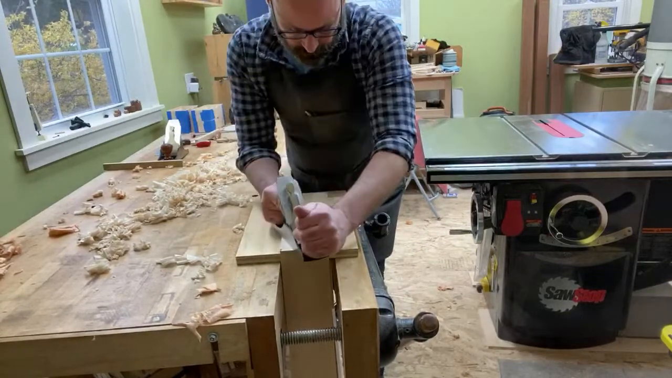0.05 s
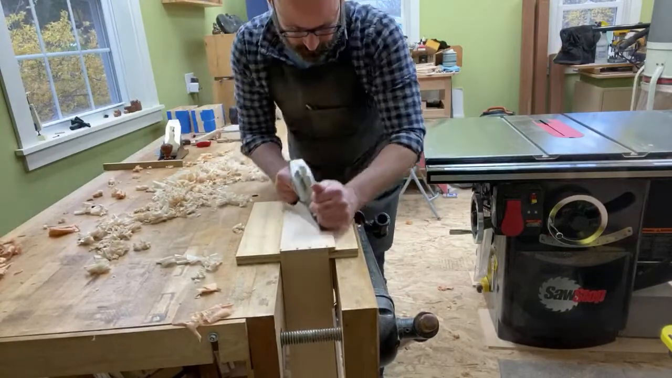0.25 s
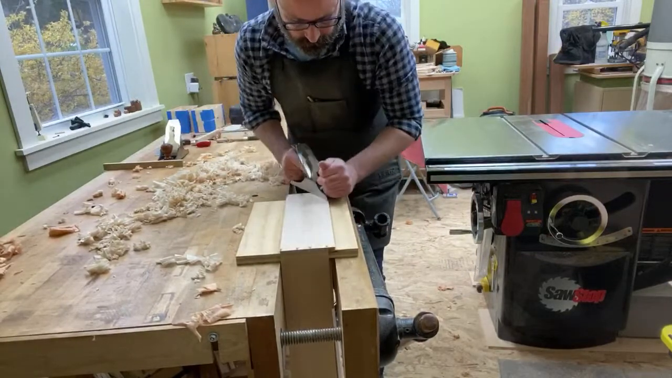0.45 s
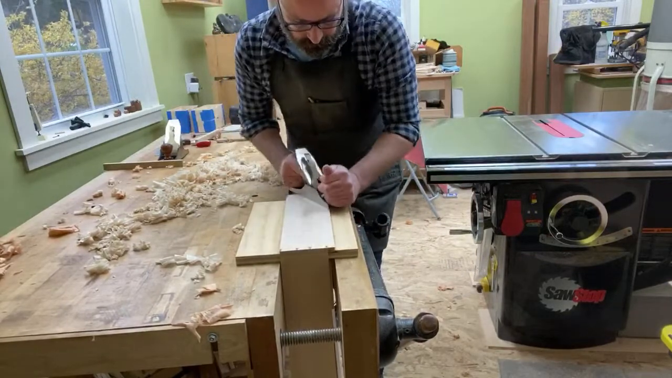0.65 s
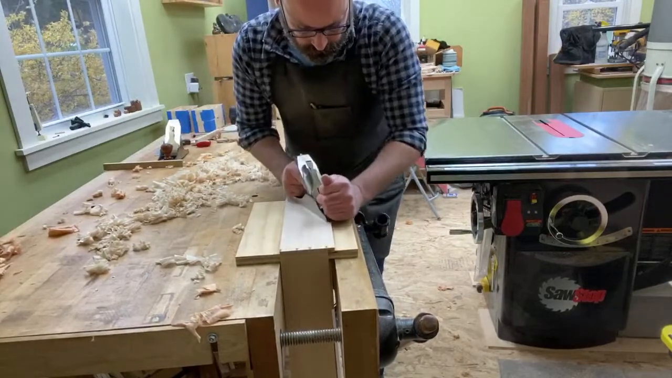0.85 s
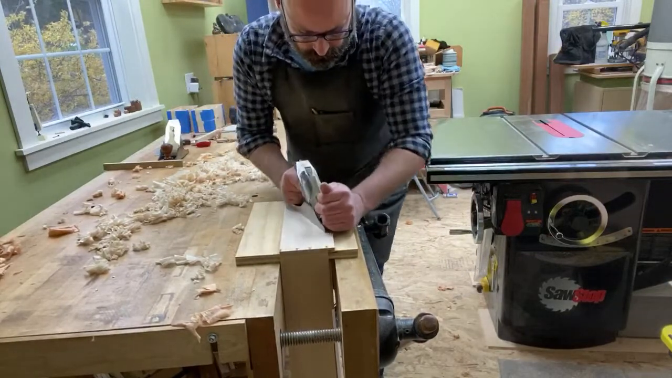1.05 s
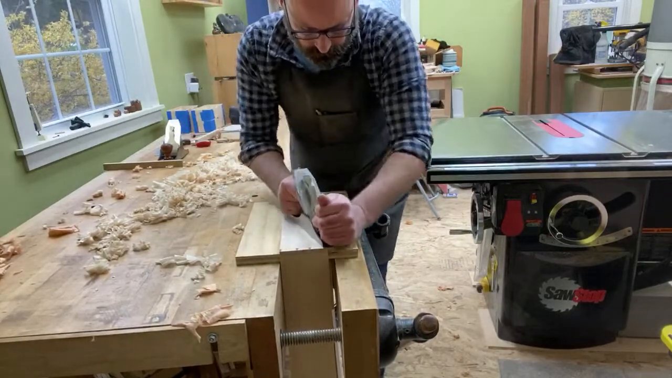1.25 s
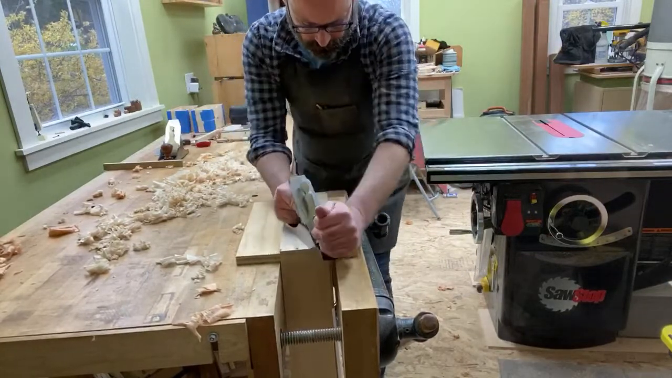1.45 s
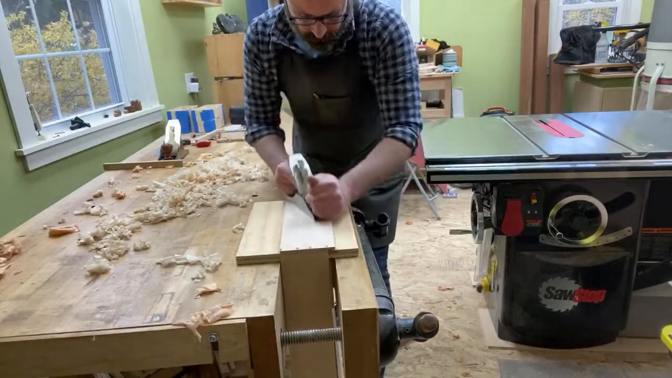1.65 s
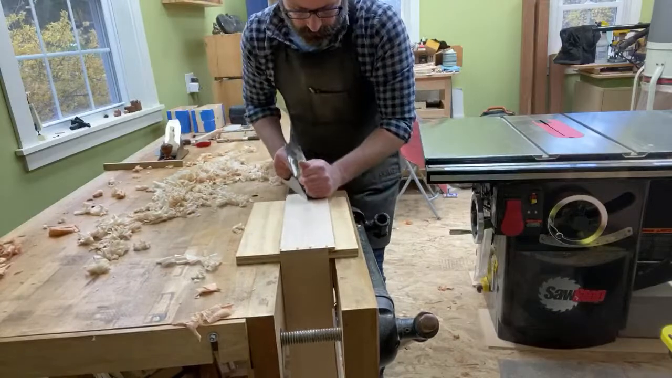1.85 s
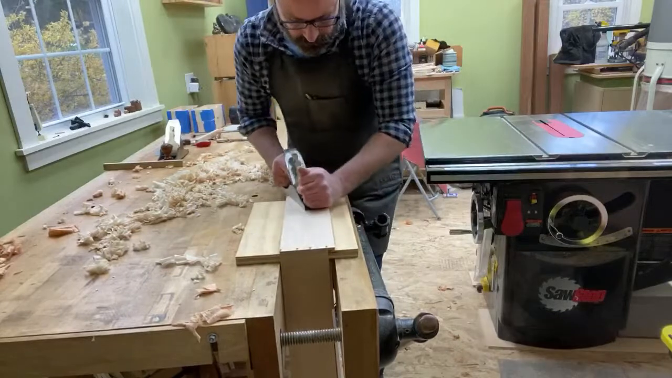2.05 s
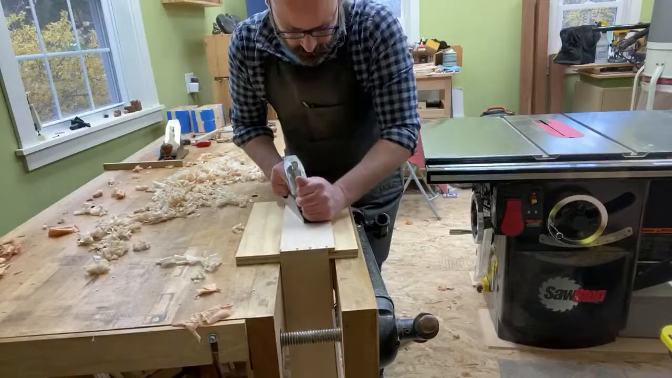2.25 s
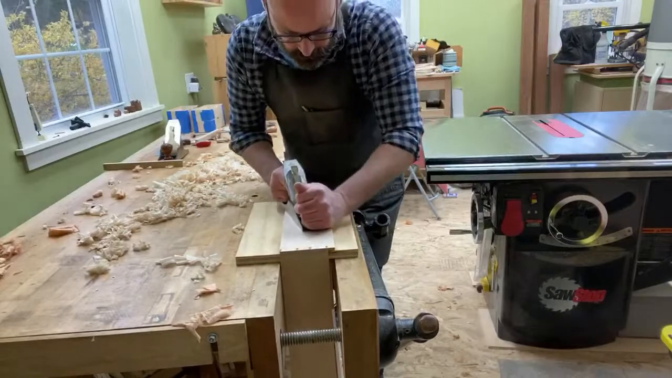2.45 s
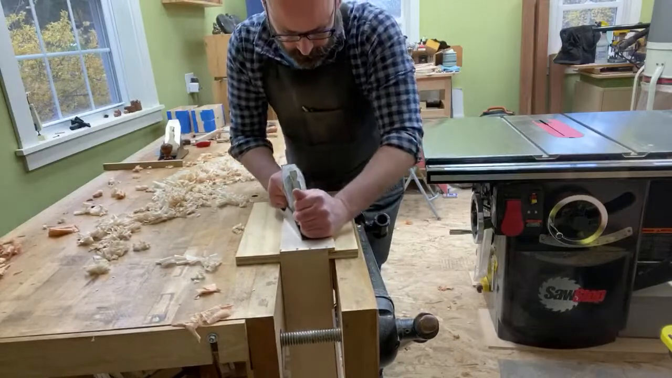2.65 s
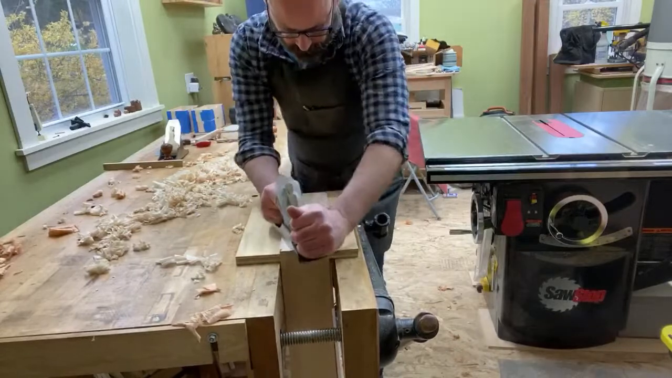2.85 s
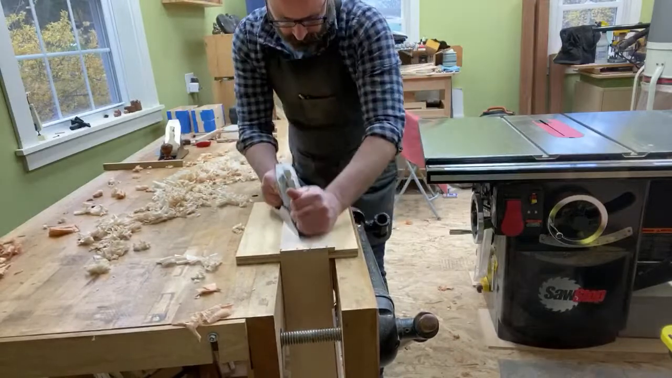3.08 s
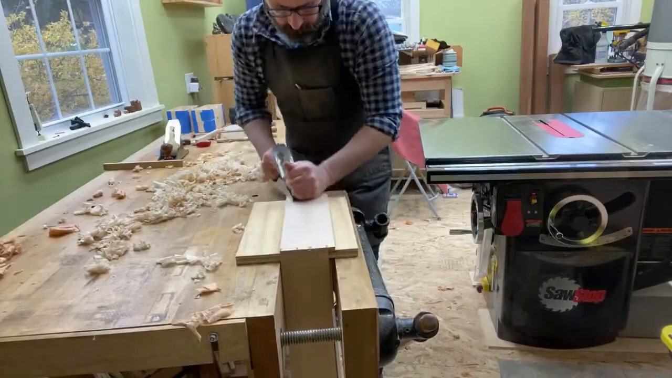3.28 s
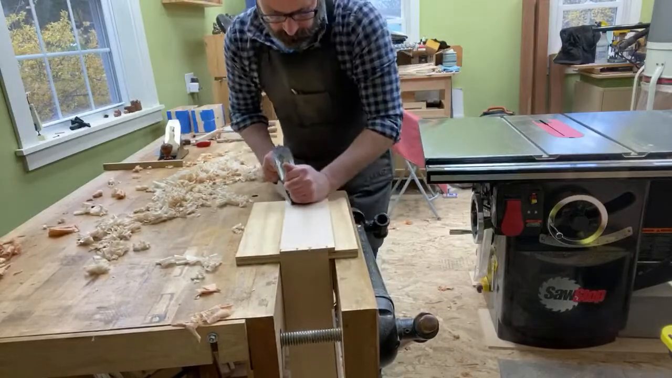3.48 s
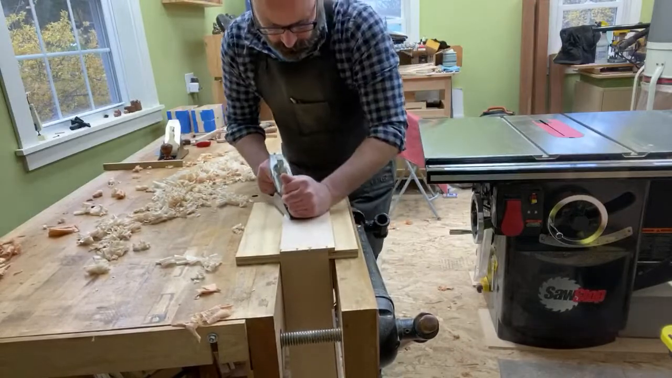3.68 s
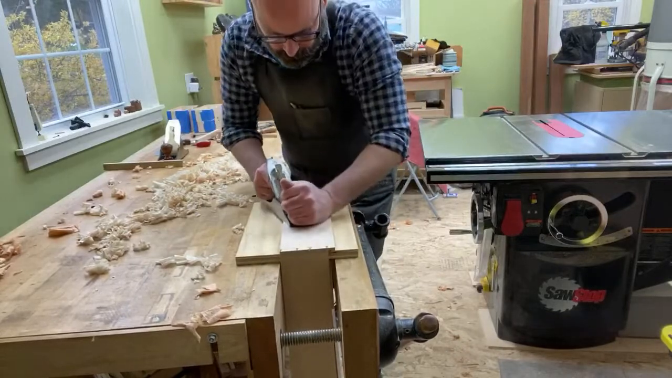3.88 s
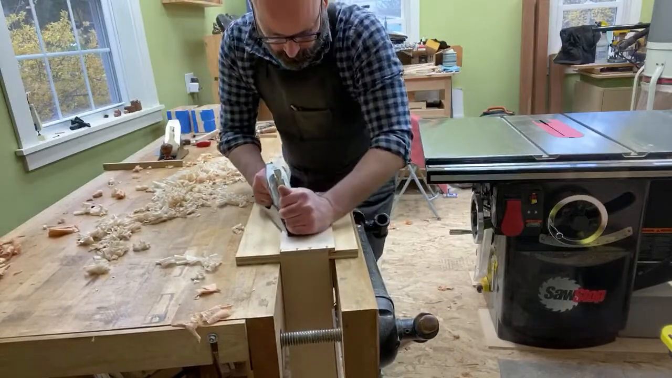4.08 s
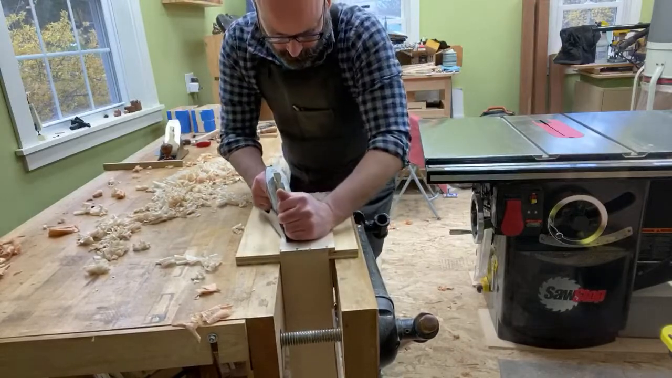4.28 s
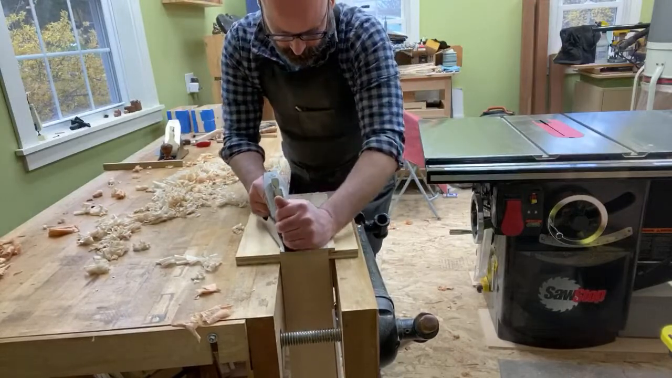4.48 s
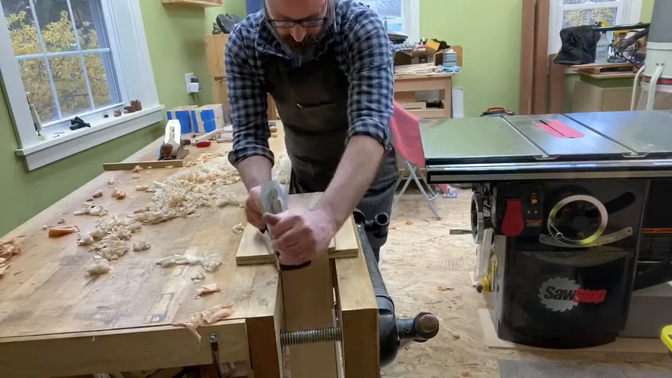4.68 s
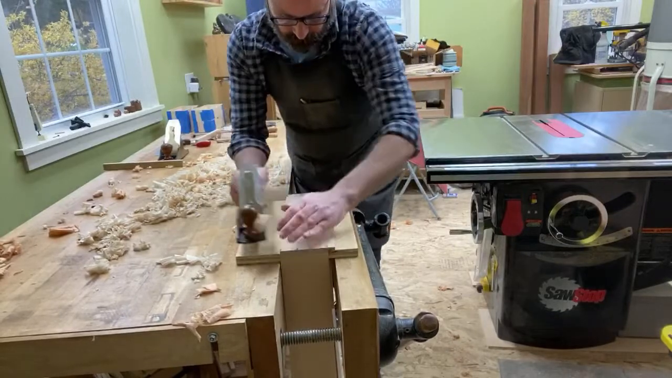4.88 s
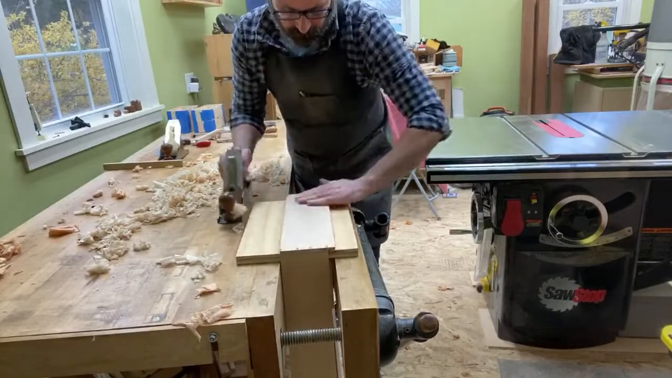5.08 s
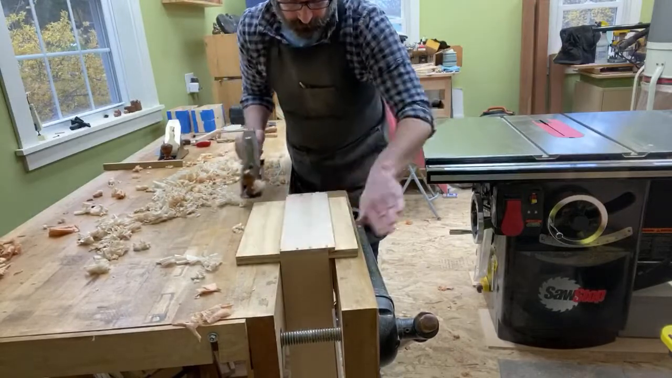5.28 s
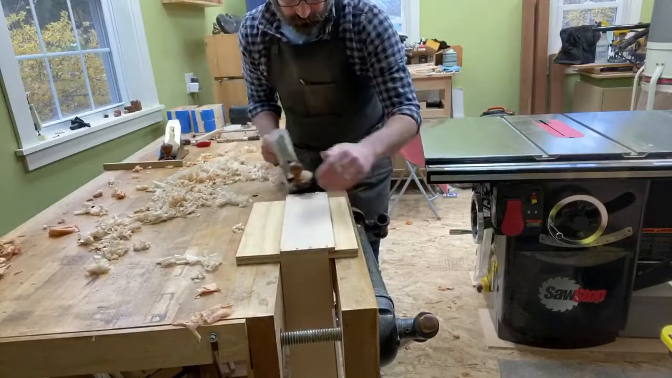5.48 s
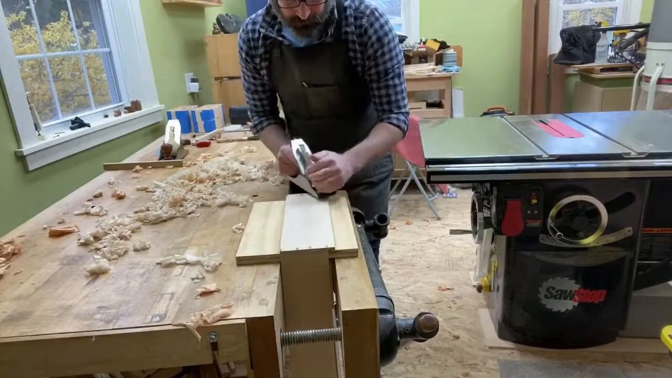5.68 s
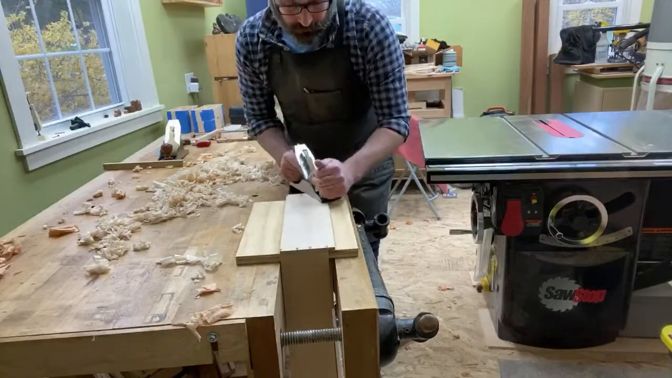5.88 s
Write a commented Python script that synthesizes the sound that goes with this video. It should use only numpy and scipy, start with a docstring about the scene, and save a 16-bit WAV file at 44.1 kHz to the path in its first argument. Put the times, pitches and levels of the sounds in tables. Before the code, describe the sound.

A hand plane works a board clamped to a wooden bench in a small, quiet shop, heard from nearby with a short, light room echo and a very faint low hush. From 0 to about 4.6 s come seven uneven passes of dry, gritty rasping: bright metallic scrape and airy hiss over a hollow wooden hum, with short stuttering shudders. A first pass ends near 0.5 s; a loud, sharp wooden clack hits at 0.6 s. Longer, fluctuating rubbing follows until 1.4 s, then a strong rasp around 1.6 s, small bumps at 1.9 s, and a long shuddering stroke to 2.9 s. Quicker scrapes follow from 3 s, with a dull thump at 3.36 s and scuffs near 3.7 s. The last pass fades by 4.6 s. A palm softly rustles chips away around 5.1 to 5.3 s with faint taps, then two firm knocks with slight metal rattle land at 5.7 and 5.8 s.

```python
"""A hand plane is pushed and drawn back over a board clamped in a bench vise, in a small quiet shop.
Rubbing and cutting are friction noises that drive the resonances of bench, board and iron plane.
The sole sticks and slips in short shudders; knocks are brief contact forces, scuffs decaying noise bursts.
A hand sweeps chips off the board as coloured friction noise; the shop adds its decaying answer and a steady hush."""
import sys
import numpy as np
from scipy import signal
from scipy.fft import rfft, irfft, next_fast_len
from scipy.io import wavfile
from scipy.ndimage import uniform_filter1d, map_coordinates

SR = 44100
rng = np.random.default_rng(int(sys.argv[2]) if len(sys.argv) > 2 else 0)


def bounce(signal):
    """Save signal as a 16-bit WAV file at the path given by the first command-line argument."""
    frames = np.transpose(np.atleast_2d(signal))
    limited = np.clip(frames, -1, 1)
    pcm = np.round(limited * 32767).astype(np.int16)
    wavfile.write(sys.argv[1], SR, pcm)


N = 261513

# Spectrum of the quiet shop's hush. Each row: frequency in Hz, relative level in dB.
HUSH = [(18, -76.5), (30, -35), (90, -7.5), (108, -8), (126, -4), (152, -11), (323, -14), (359, -8.5),
        (518, -16), (672, -17), (1020, -19.5), (1960, -24.5), (3060, -25.5), (8710, -35), (15500, -44.5)]
HUSH_DB = -64.5  # rms level of the hush
# Decay of the shop's answer. Each row: frequency in Hz, time to fall 60 dB in s.
SHOP = [(100, 0.97), (300, 0.34), (1000, 0.5), (3000, .4), (10000, 0.16)]
SHOP_BASS_HZ = 450  # the shop answers weakly below this
TOP_HZ = 15700  # upper band limit of the input

# A hand sweeping chips off the board. Each row: time in s, level in dB.
SWEEP = [(4.97, -85.5), (5.05, -65.5), (5.1, -60.5), (5.16, -58.5), (5.2, -59), (5.24, -58.5), (5.32, -76),
         (5.45, -89)]
# Spectral weighting of the rustling chips. Each row: frequency in Hz, gain in dB.
CHIPS = [(300, -40), (900, -10), (2000, -7.5), (3300, -2), (4200, -3), (6000, -9), (10000, -18.5),
         (15500, -27.5)]

# Resonances of bench top, bench legs, board, plane body, cap, iron and board edge.
# Each row: frequency in Hz, width in Hz, relative level in dB.
BENCH = [(223, 12, -18.5), (312.5, 20, 6.5), (372.6, 14, -18), (379, 110, -12)]
LEGS = [(74.6, 13, -3.5), (139.7, 7.9, -4), (179.3, 15, -3)]
BOARD = [(483, 130, -12.5), (563.2, 12, -3.5), (675, 24, -9), (701.4, 17, -10.5), (753, 23, -2.5),
         (817.5, 40, -6.5), (930, 90, -18), (989, 19, -12), (1065, 120, -23), (1265, 69, -20.5),
         (1262, 56, -17), (1444, 54, -24.5), (1453, 43, -20.5), (1746, 53, -8.5), (1000, 1200, -12.5)]
PLANE = [(2460, 200, -14.5), (2623, 180, 11), (3180, 240, -2), (3510, 39, -0.5), (2900, 1800, 6)]
CAP = [(4110, 170, 4.5), (5445, 130, 3.5), (5800, 110, -6), (6366, 160, -2.5), (5280, 2200, -9)]
IRON = [(6420, 900, 0), (8180, 50, -7.5), (9500, 93, 6), (9500, 120, -4.5), (10000, 100, -5),
        (10960, 110, -3.5), (12200, 120, -2.5), (12830, 300, -10), (13970, 250, -10), (9190, 3800, -4)]
EDGE = [(670, 360, 0.85), (1210, 760, -0.79), (2450, 1500, -2.3)]
# Resonances of the vise that carries blows into the bench. Each row: frequency in Hz, width in Hz, level in dB.
VISE = [(330, 61, -2.5), (324, 380, -8)]
# Radiation of each body. Each row: its resonances, weak below in Hz, weak above in Hz.
BODIES = [(BENCH, 310, 450), (LEGS, 55, 1100), (BOARD, 423, 2080), (PLANE, 1600, 4800), (CAP, 5030, 7800),
          (IRON, 2400, 10000), (EDGE, 92, 3750)]

# Short scrapes over an edge. Each row: start in s, edge level in dB, plane body level in dB, iron level in dB,
# rise time constant in ms, time to fall 60 dB in ms.
SCUFFS = [(.036, -31.5, -39.5, -51.5, 2.6, 193), (.054, -27, -40, -51, 1.6, 78),
          (1.403, -30.5, -41, -56, 4.4, 97), (1.545, -38, -59, -75, 5.1, 63),
          (2.031, -31.5, -37, -62, 4, 128), (2.889, -33.5, -50, -62, 3.4, 128),
          (2.934, -33, -55, -68, 5.2, 135), (3.056, -35.5, -50, -66, 5, 79),
          (3.242, -30, -39.5, -57, 1.9, 86), (3.66, -34.5, -44, -60, 8, 110),
          (3.678, -28, -45, -62, 5.2, 105), (3.706, -25, -35, -52, 5.3, 91), (4.56, -44, -45, -48, 4.2, 79),
          (5.206, -42, -43, -54, 2, 37)]
# Scuff force on bench, legs and board, in dB relative to the edge.
SCUFF_WOOD_DB = [-21.5, -23.5, -4.5]
SCUFF_CAP_DB = -10.5  # relative to the plane body

# Blows on the wood. Each row: start in s; force in dB on board, bench (before the vise), legs, plane body and cap;
# clatter in dB; contact spring frequency in Hz; time to the peak of the contact push in ms.
KNOCKS = [(.395, -42.5, -40.5, -58, -55.5, -45, -53.5, 625, 1.43),
          (.545, -57.5, -45, -52, -59, -55.5, -61, 750, 5.5),
          (.593, -12.5, -9, -31.5, -47, -21, -30, 703, 1.9),
          (1.872, -38, -28.5, -41, -61, -54.5, -48, 655, 1.8),
          (1.914, -42, -53, -44, -50.5, -39, -51, 674, 1.55),
          (3.358, -36, -15.5, -31, -59, -41, -35.5, 757, 1.67),
          (3.444, -48.5, -28.5, -41, -60, -54, -40, 684, 2.7),
          (4.559, -45, -33, -48.5, -55, -39, -50.5, 747, 2.83),
          (4.914, -71, -52, -74.5, -69.5, -66.5, -67, 690, 1.3),
          (5.154, -73.5, -54, -61.5, -72, -43, -70.5, 668, 1.6),
          (5.212, -49.5, -25, -43, -59, -33.5, -59, 625, 2.9),
          (5.242, -59, -27, -45.5, -72, -64.5, -64.5, 626, 1.9),
          (5.323, -78, -51, -53.5, -78.5, -62.5, -76, 610, 1.9),
          (5.708, -29.5, -14.5, -44.5, -29.5, -40.5, -26.5, 1430, 1.2),
          (5.798, -24.5, -12, -43, -35.5, -43, -36, 690, 1.73)]

# Stick-slip of the sole with the bench top. Each row: middle in s, peak force in dB, width between 1/e points in ms.
SHUDDERS = [(.155, -78, 60), (.435, -76, 34), (.498, -71, 24), (.976, -72, 43), (1.084, -71, 50),
            (1.2, -63.5, 32), (1.41, -71, 27), (1.55, -68, 29), (1.72, -75.5, 34), (1.85, -68, 38),
            (2.075, -63, 37), (2.195, -75, 32), (2.34, -70.5, 70), (2.59, -60.5, 87), (2.689, -60, 56),
            (2.79, -63.5, 62), (2.9, -71, 89), (3.18, -72, 70), (3.9, -71.5, 73), (4.0, -66, 37),
            (4.055, -64.5, 41), (4.214, -62, 60), (4.32, -68, 65), (4.464, -61.5, 110)]
SHUDDER_HZ, SHUDDER_SPREAD_HZ = 316.6, 4  # near the bench top's main mode; standard deviation of the pitch
SHUDDER_BOARD_DB = 4.5  # friction it shakes into the board, relative to the peak of its slips

# The plane on the move, one table a pass.
# Each row: time in s, rasp level in dB, treble in dB over the rasp, hum of the bench top in dB.
PASSES = [
    [(0.0, -67, -10, -49), (.035, -69, -16, -61), (.11, -49.5, -16, -56.5), (.2, -52, -17, -58),
     (.25, -50.5, -11, -65), (.3, -50, -17, -77), (.4, -55, -12, -55), (.52, -73, -12.5, -56.5)],
    [(.57, -57, -13, -46), (.64, -50.5, -11, -45.5), (.8, -53, -17, -49.5), (1.0, -57.5, -8, -52.5),
     (1.2, -54.5, -14, -51.5), (1.28, -52, -14, -57), (1.39, -63, -12, -50)],
    [(1.42, -53.5, -24, -54), (1.53, -56.5, -22, -54.5), (1.61, -42.5, -14.5, -56), (1.67, -46.5, -10, -68),
     (1.77, -47.5, -16, -61), (1.85, -66, -18, -47.5)],
    [(1.9, -57, -8, -51), (2.0, -52, -11.5, -55), (2.15, -48.5, -19, -47.5), (2.25, -51, -13, -66),
     (2.49, -53, -17, -51), (2.58, -51, -15, -52), (2.7, -48, -11.5, -49), (2.8, -48, -12, -58),
     (2.87, -69, -28, -49.5)],
    [(2.99, -53, -14, -71), (3.05, -44.5, -13, -60), (3.15, -46.5, -10, -49.5), (3.19, -52.5, -12, -57),
     (3.23, -51.5, -7, -49), (3.34, -68.5, -14.5, -48.5)],
    [(3.37, -53, -12, -37), (3.47, -57, -11, -48), (3.54, -49, -12, -61), (3.62, -56, -8, -72),
     (3.7, -47, -12, -48), (3.78, -53, -20, -47)],
    [(3.84, -42.5, -16, -68), (3.92, -49.5, -14, -51.5), (4.08, -55.5, -13, -52.5), (4.26, -56, -16.5, -47),
     (4.43, -50.5, -14.5, -49.5), (4.56, -58, -8.5, -51.5), (4.75, -89, -5, -77), (4.85, -96.5, -8, -82.5)],
]
# How hard the cap rings along. Each row: time in s, level in dB over the rasp.
CAP_RING = [(0, -12), (.4, -5), (.64, -5.5), (1.0, -6.5), (1.29, 0), (1.6, -10.5), (1.85, -7.5), (2.0, 5),
            (2.2, -6.5), (2.5, -11.5), (2.8, -0.5), (3.1, -11.5), (3.38, -2.5), (3.54, 7.5), (3.66, -1),
            (3.9, -12.5), (4.28, -5), (4.42, -4.5), (4.85, 2)]
USUAL_RASP_DB = -52  # a middling pass
RUB_DB, RUB_FOLLOWS = -50.5, 0.55  # the sole's rub in a middling pass; its swing for each dB of rasp
HUM_PULSE_DB, HUM_PULSES_PER_S = 4, 11  # swing of the uneven hum; random knots a second


def amp(db):
    """Level law: gain of a level in dB."""
    return 10 ** (np.asarray(db) / 20)


def unit(x):
    """Power normalisation: x at rms 1."""
    return x / np.sqrt(np.mean(x ** 2) + 1e-20)


def along(points, hz):
    """Logarithmic frequency scale: (Hz, value) points are joined by straight lines."""
    point_hz, values = np.transpose(points)
    return np.interp(np.log(hz + 1), np.log(point_hz + 1), values)


def curves(rows):
    """Linear interpolation in time: one curve a column after the time, -120 dB outside the table."""
    s, *columns = np.transpose(rows)
    t = np.arange(N) / SR
    return [np.interp(t, s, column, left=-120, right=-120) for column in columns]


def wobble(rate):
    """Band-limited fluctuation: a smooth random curve, rate knots a second."""
    knots = rng.standard_normal(int(N * rate / SR) + 4)
    return map_coordinates(knots, [np.arange(N) * rate / SR])


def filtered(x, response):
    """Linear filtering: the spectrum of x times a complex response of frequency."""
    size = next_fast_len(N + SR // 2)  # the spare half second holds the tails
    hz = np.fft.rfftfreq(size, 1 / SR)
    return irfft(rfft(x, size) * response(hz), size)[..., :N]


def modes_of(modes, f):
    """Modal superposition: damped resonances of alternating sign are summed."""
    return sum((-1) ** k * amp(db) * 1j * f * width / (centre ** 2 - f ** 2 + 1j * f * width)
               for k, (centre, width, db) in enumerate(modes))


def rung(force, modes, low_hz, high_hz):
    """Forced vibration: a body's modes filter the force; white noise of rms 1 gives about rms 1."""
    def body(f):
        low_skirt = (1j * f / low_hz / (1 + 1j * f / low_hz)) ** 3
        high_skirt = 1 / (1 + 1j * f / high_hz) ** 4
        response = modes_of(modes, f) * low_skirt * high_skirt
        return response / np.sqrt(np.mean(abs(response) ** 2))
    return filtered(force, body)


def patchy(x, patch_db):
    """Time-frequency modulation: random gain in patches shifts the colour as the grain changes."""
    z = signal.stft(x, nperseg=256)[2]
    field = uniform_filter1d(rng.standard_normal(z.shape), size=4, axis=0)  # smooth over frequency
    field = uniform_filter1d(field, size=14, axis=1)  # smooth over time
    return unit(signal.istft(z * amp(patch_db * unit(field)), nperseg=256)[1][:N])


def friction(grit_db, slip_db):
    """Dry friction: noise of rms 1 that catches on single fibres and swells with slower slips."""
    swing_db = grit_db * wobble(700) + slip_db * wobble(35)
    return patchy(amp(swing_db) * rng.standard_normal(N), patch_db=3.0)


def hiss(spectrum):
    """Stationary random sound: smooth coloured noise of rms 1."""
    return unit(filtered(rng.standard_normal(N), lambda hz: amp(along(spectrum, hz))))


def shop(x):
    """Reverberation: each frequency of the room's noise-like answer decays at its own speed."""
    hz, t, z = signal.stft(rng.standard_normal(SR // 2), SR, nperseg=256)
    decay = amp(-60 * t / along(SHOP, hz)[:, None])
    tail = signal.istft(z * decay, SR, nperseg=256)[1]
    delayed = np.pad(x, (180, 0))  # samples, about 4 ms
    return signal.fftconvolve(delayed, tail / np.linalg.norm(tail))[:N]


def sweep():
    """Granular friction: light chips rustle under the palm."""
    grains = friction(grit_db=2, slip_db=1)
    rustle = unit(filtered(grains, lambda hz: amp(along(CHIPS, hz))))
    return amp(curves(SWEEP)[0]) * rustle


def scuff_forces():
    """Transient friction: a scrape rises fast and dies away, mostly heard from the edge itself."""
    force = np.zeros((len(BODIES), N))
    t_ms = np.arange(SR // 4) * 1000 / SR
    for s, edge_db, plane_db, iron_db, rise_ms, t60_ms in SCUFFS:
        burst = (1 - np.exp(-t_ms / rise_ms)) ** 2 * amp(-60 * t_ms / t60_ms)
        wood_db = np.add(edge_db, SCUFF_WOOD_DB)
        levels = amp([*wood_db, plane_db, plane_db + SCUFF_CAP_DB, iron_db, edge_db])
        noise = rng.standard_normal((len(BODIES), len(t_ms)))
        force[:, round(s * SR):][:, :len(t_ms)] += levels[:, None] * burst * noise
    return force


def knock_forces():
    """Impact: the plane lands on springy wood and rocks; metal rattles and buzzes, the loose board clatters on."""
    force = np.zeros((len(BODIES), N + SR))
    t = np.arange(SR // 4) / SR
    thud = np.exp(-t / 0.00027)
    for s, board_db, bench_db, legs_db, plane_db, cap_db, clatter_db, spring_hz, peak_ms in KNOCKS:
        u = t * 1000 / peak_ms
        push = (u * np.exp(1 - u)) ** 2
        rocking = push * np.sin(2 * np.pi * spring_hz * t)
        noise = uniform_filter1d(rng.standard_normal((4, len(t))), size=6)
        buzz = amp(-15 - 60 * t / 0.22)
        clatter = amp(clatter_db - 60 * t / 0.18) * (1 - np.exp(-t / 0.006)) * noise[3]
        blow = [
            amp(bench_db) * thud,
            amp(legs_db) * thud,
            amp(board_db) * (rocking + amp(3.0) * push * noise[0]),
            amp(plane_db) * (push + buzz) * noise[1],
            amp(cap_db) * push * noise[2],
            0 * t,  # no blow on the iron
            clatter,
        ]
        force[:, round(s * SR):][:, :len(t)] += blow
    force = force[:, :N]
    # the bench takes a blow through the vise and swells late
    force[0] = filtered(force[0], lambda f: amp(9.0) * modes_of(VISE, f))
    return force


def shudders():
    """Stick-slip: bell-shaped bursts, each with its own pitch and phase; returns the slips and their swell."""
    t = np.arange(N) / SR
    slips, swell = np.zeros(N), np.zeros(N)
    draws = rng.standard_normal((len(SHUDDERS), 2))
    for (s, force_db, length_ms), (detune, phase) in zip(SHUDDERS, draws):
        bell = amp(force_db) * np.exp(-(2000 * (t - s) / length_ms) ** 2)
        pitch_hz = SHUDDER_HZ + SHUDDER_SPREAD_HZ * detune
        slips += bell * np.sin(2 * np.pi * (pitch_hz * t + phase))
        swell += bell
    return slips, swell


def stroke_forces():
    """Sliding and cutting friction: the sole drives bench, legs and board; the edge drives plane, cap and iron."""
    rasp_db, treble_db, hum_db = curves(np.vstack(PASSES))
    rub_db = RUB_DB + RUB_FOLLOWS * (rasp_db - USUAL_RASP_DB)
    ring_db, = curves(CAP_RING)
    slips, swell = shudders()
    pulses = amp(hum_db + HUM_PULSE_DB * wobble(HUM_PULSES_PER_S))
    drag = slips + pulses * friction(grit_db=2.0, slip_db=1.4)
    under_way = hum_db > -119  # false once the last pass is over
    rub_level = under_way * amp(rub_db) + amp(SHUDDER_BOARD_DB) * swell
    rub = rub_level * friction(grit_db=1.5, slip_db=2.05)
    shake = under_way * amp(rub_db - 21.0) * friction(grit_db=5.0, slip_db=6.0)
    cutting = [amp(rasp_db + extra_db) * friction(grit_db=1.5, slip_db=0.55)
               for extra_db in (0, ring_db, treble_db)]
    return np.array([drag, shake, rub, *cutting, np.zeros(N)])  # in the order of BODIES


def scene():
    """Superposition: forces ring the bodies, the chips rustle, and the shop answers over its steady hush."""
    forces = stroke_forces() + knock_forces() + scuff_forces()
    bodies = sum(rung(force, *body) for force, body in zip(forces, BODIES))
    near = bodies + sweep()
    into_shop = filtered(near, lambda hz: 1j * hz / (SHOP_BASS_HZ + 1j * hz))
    answer = amp(-8.5) * shop(into_shop)
    return (near + answer + amp(HUSH_DB) * hiss(HUSH))[None]


def record(dry):
    """Transduction: the microphone's treble droops; the input rounds off loud peaks and limits the band."""
    heard = filtered(dry, lambda hz: 1 / (1 + (hz / 15000) ** 6))
    ceiling = .85  # of full scale
    rounded = heard / (1 + abs(heard / ceiling) ** 4) ** .25
    return filtered(rounded, lambda hz: (hz < TOP_HZ) * (1j * hz / (45 + 1j * hz)) ** 2)


dry = scene()
out = record(dry)
bounce(out)
```